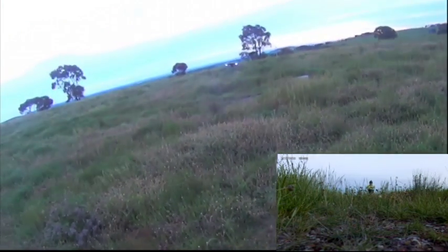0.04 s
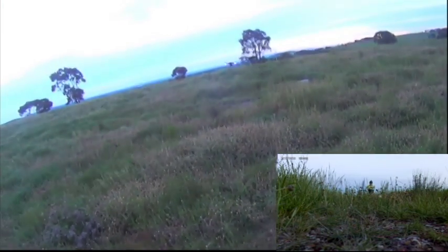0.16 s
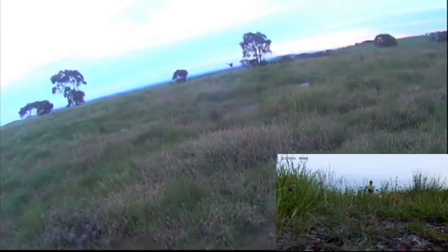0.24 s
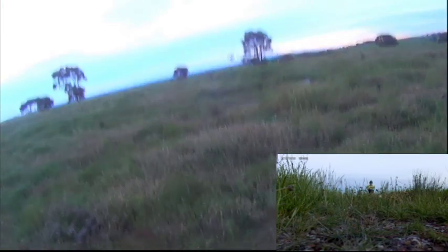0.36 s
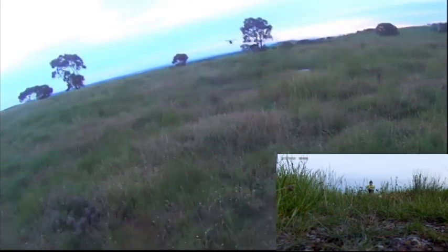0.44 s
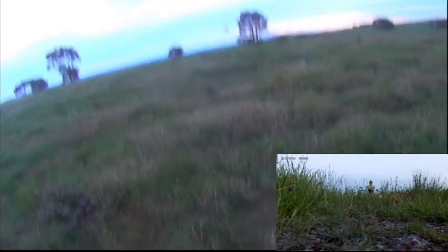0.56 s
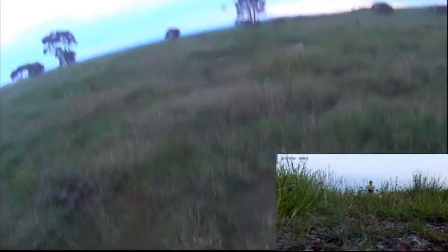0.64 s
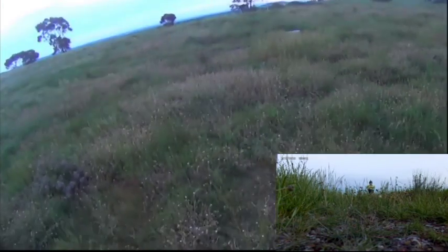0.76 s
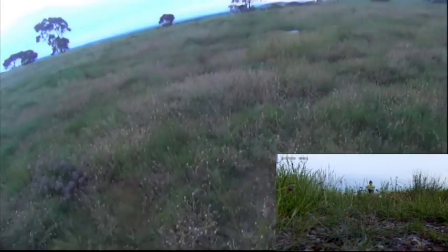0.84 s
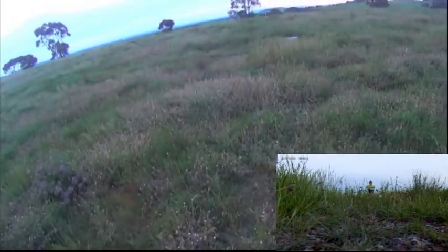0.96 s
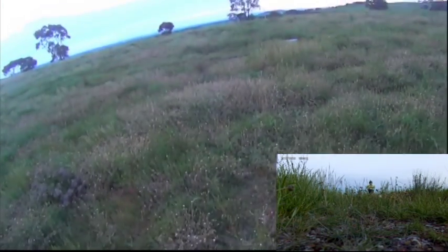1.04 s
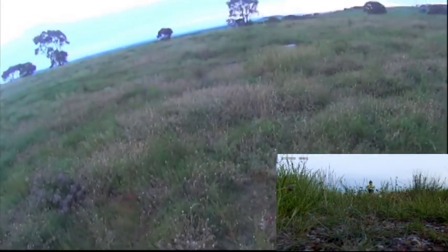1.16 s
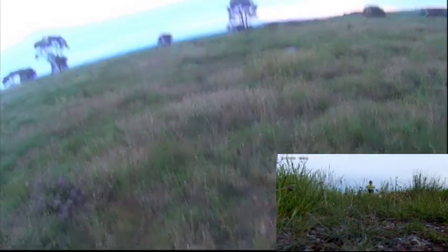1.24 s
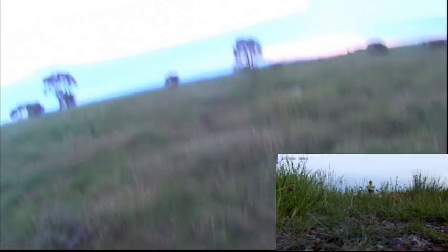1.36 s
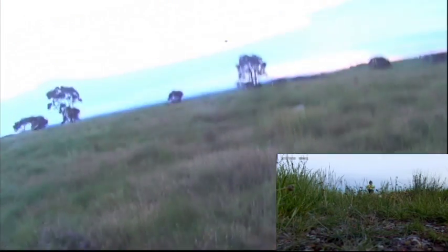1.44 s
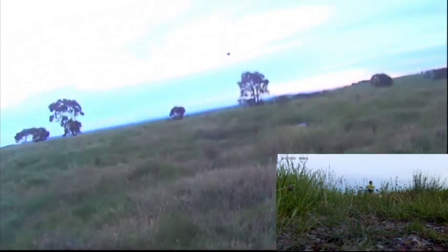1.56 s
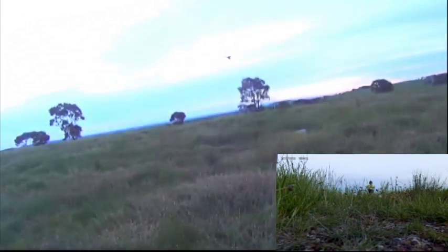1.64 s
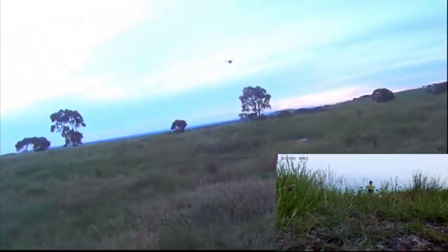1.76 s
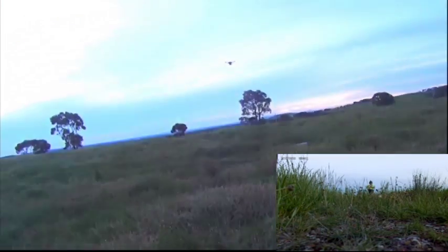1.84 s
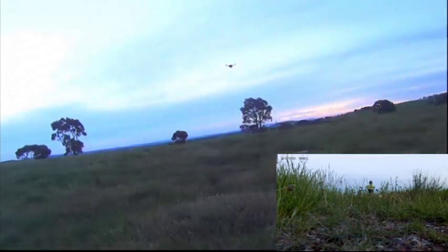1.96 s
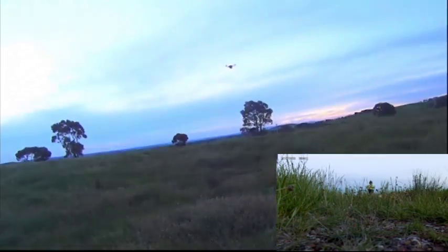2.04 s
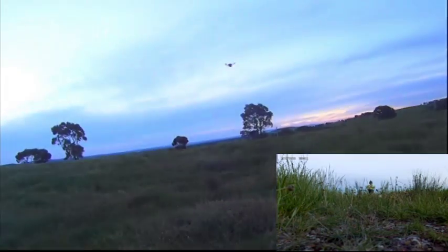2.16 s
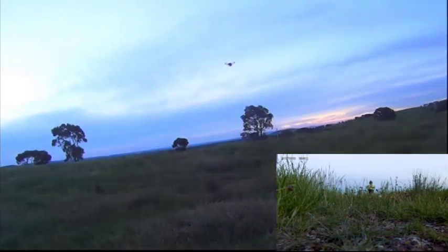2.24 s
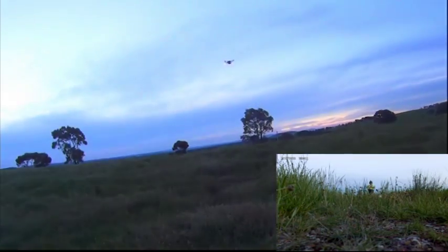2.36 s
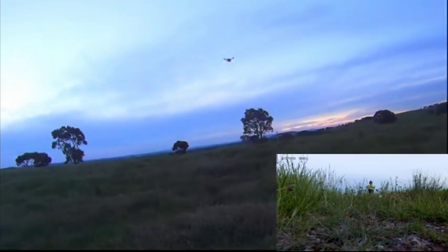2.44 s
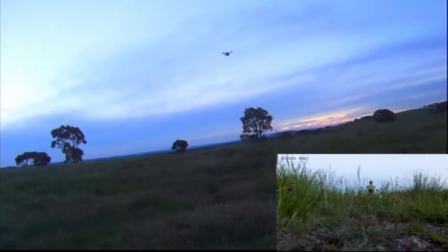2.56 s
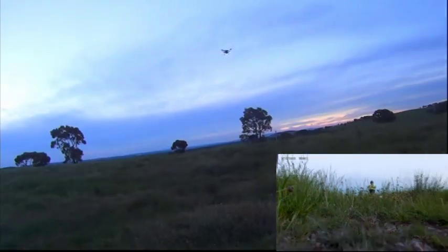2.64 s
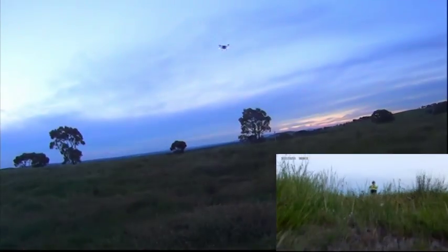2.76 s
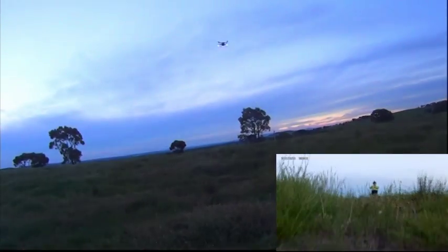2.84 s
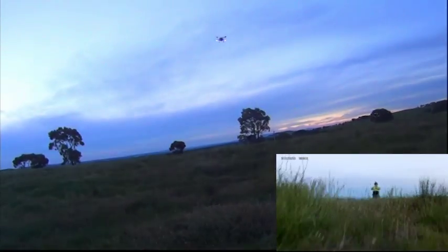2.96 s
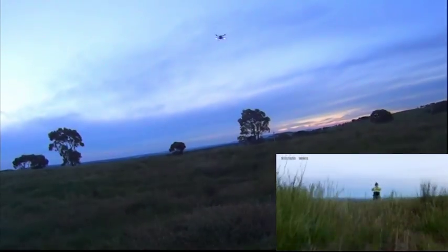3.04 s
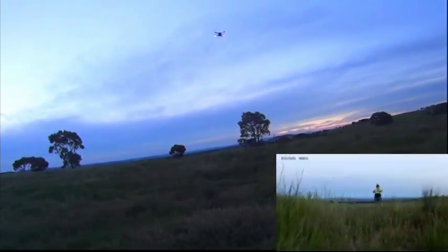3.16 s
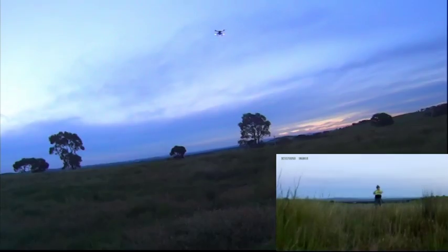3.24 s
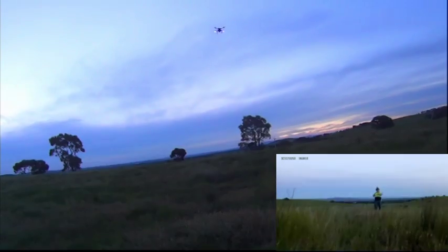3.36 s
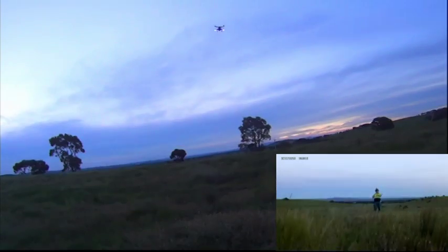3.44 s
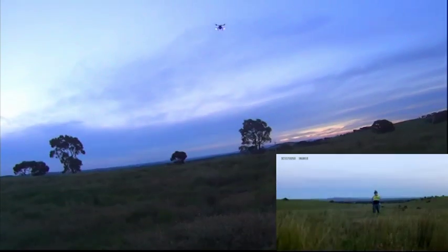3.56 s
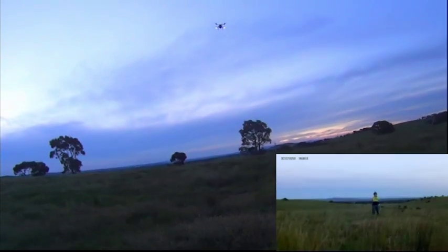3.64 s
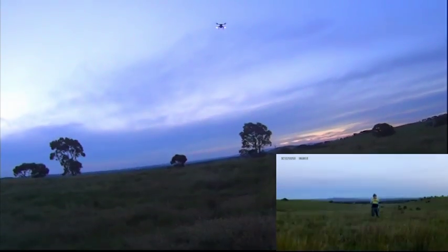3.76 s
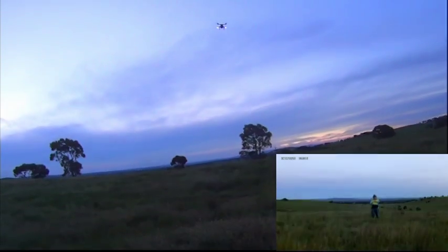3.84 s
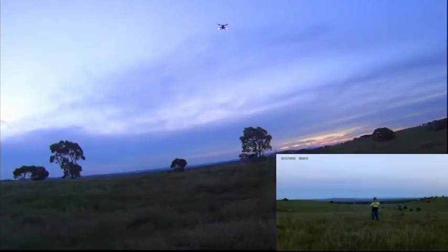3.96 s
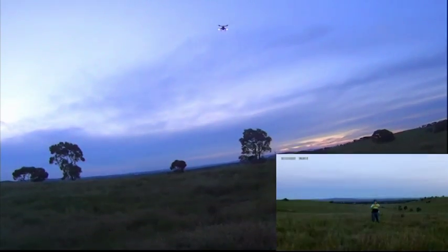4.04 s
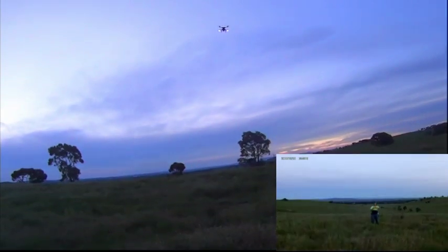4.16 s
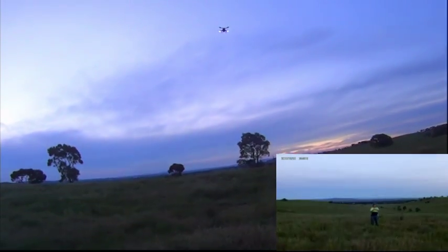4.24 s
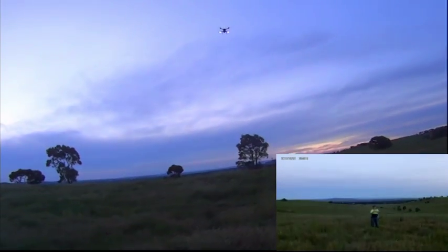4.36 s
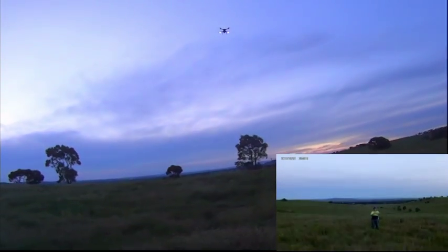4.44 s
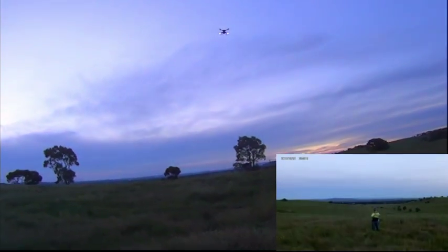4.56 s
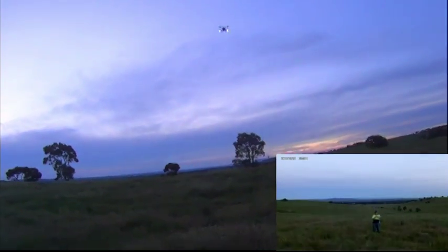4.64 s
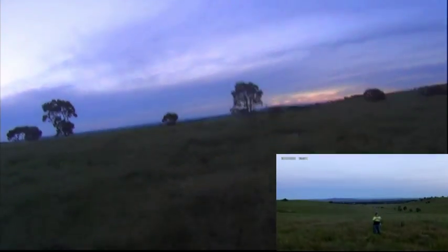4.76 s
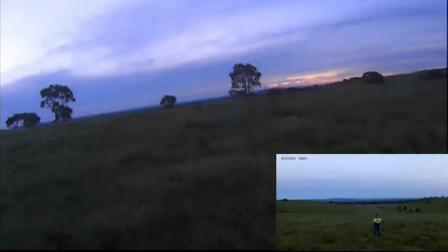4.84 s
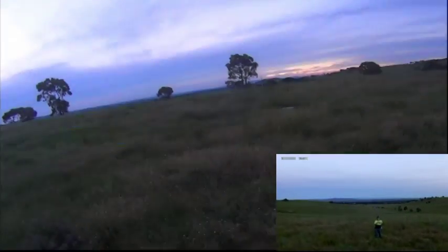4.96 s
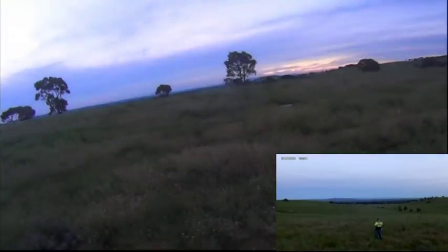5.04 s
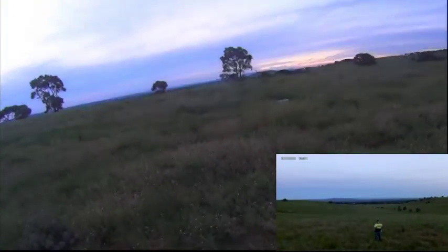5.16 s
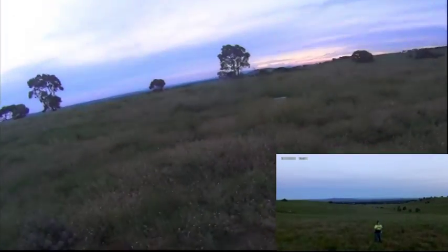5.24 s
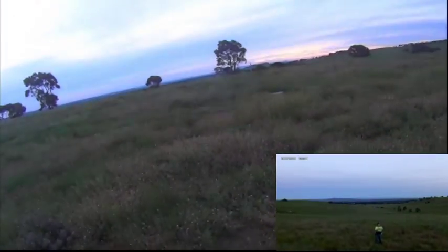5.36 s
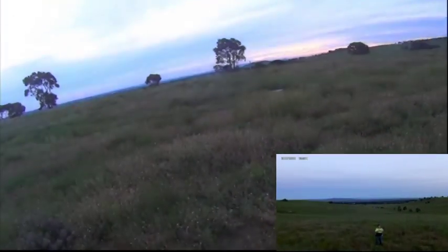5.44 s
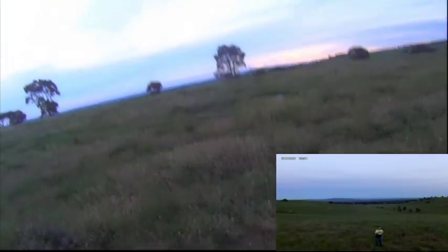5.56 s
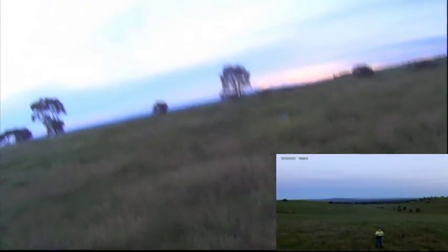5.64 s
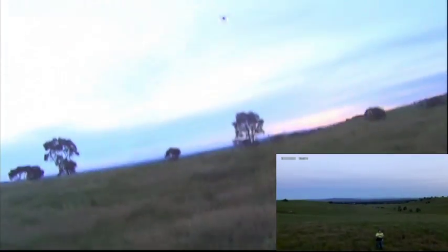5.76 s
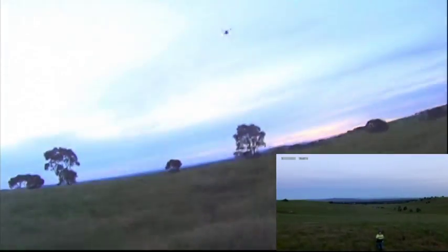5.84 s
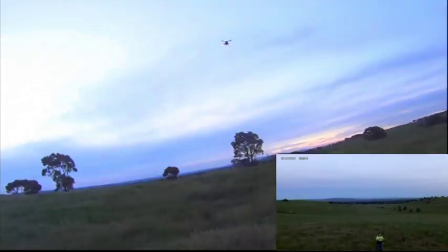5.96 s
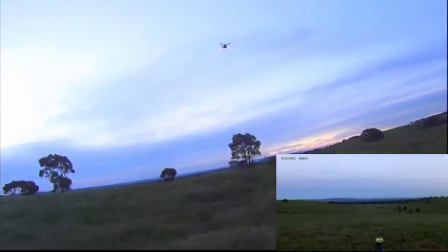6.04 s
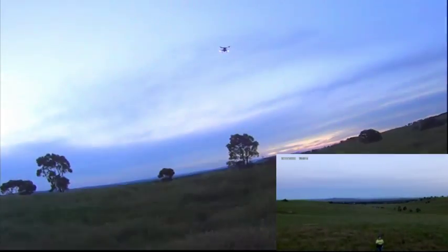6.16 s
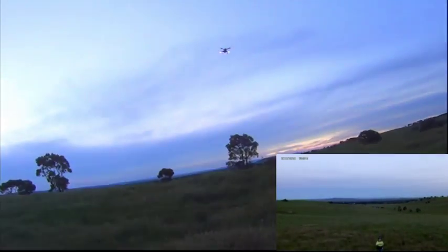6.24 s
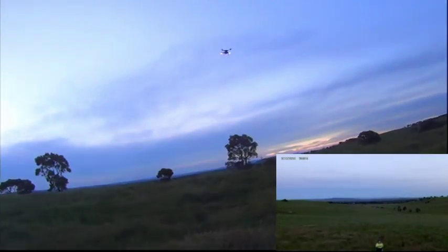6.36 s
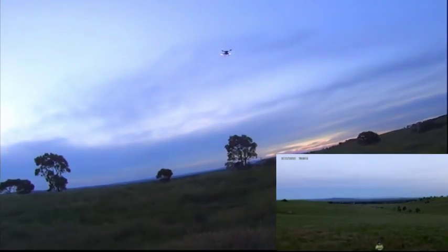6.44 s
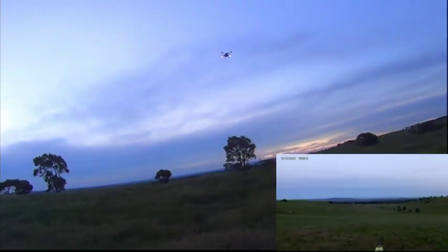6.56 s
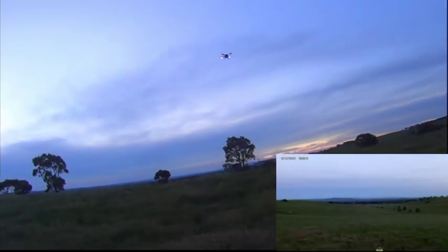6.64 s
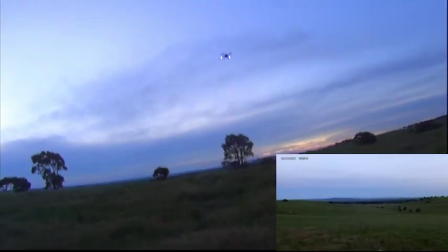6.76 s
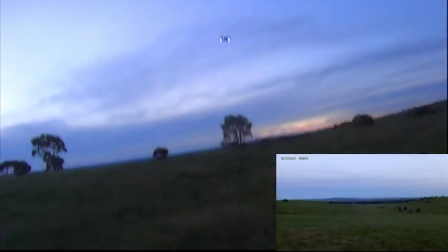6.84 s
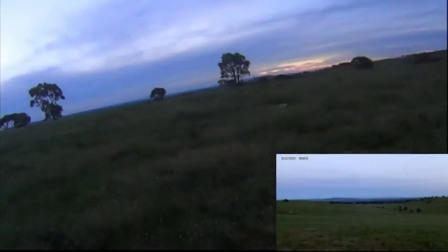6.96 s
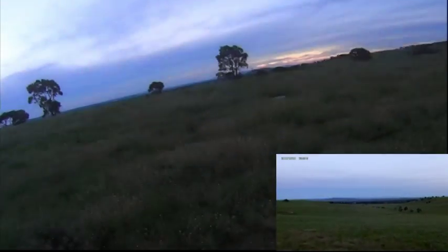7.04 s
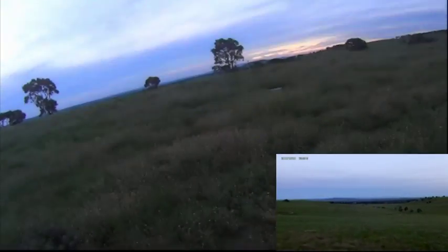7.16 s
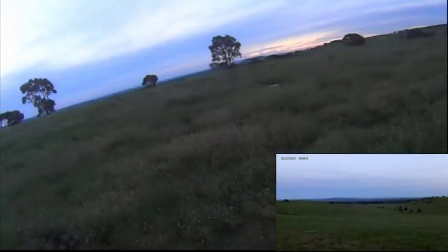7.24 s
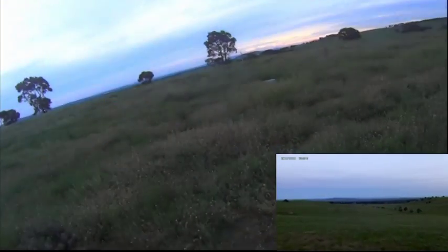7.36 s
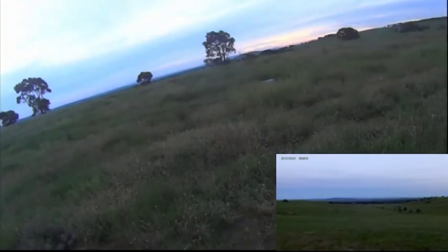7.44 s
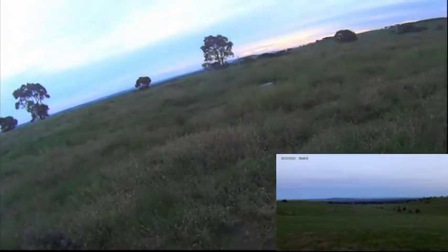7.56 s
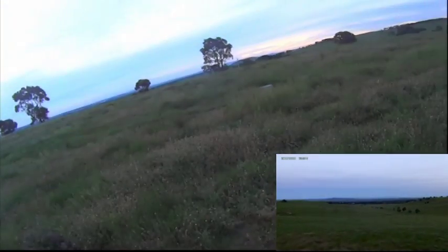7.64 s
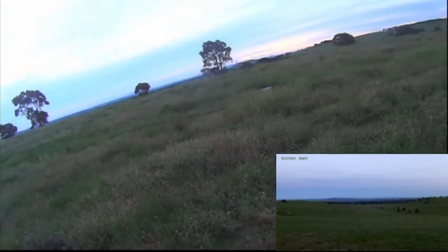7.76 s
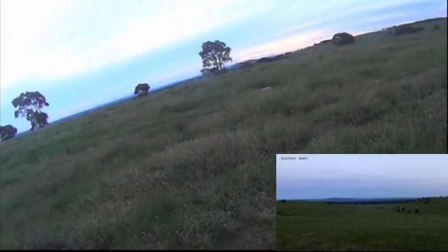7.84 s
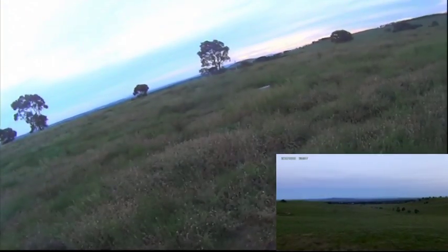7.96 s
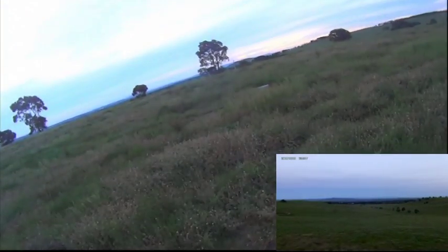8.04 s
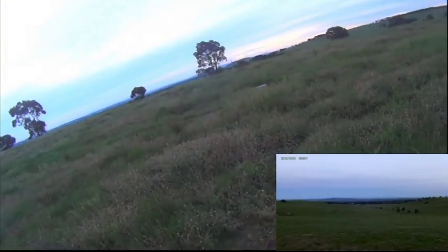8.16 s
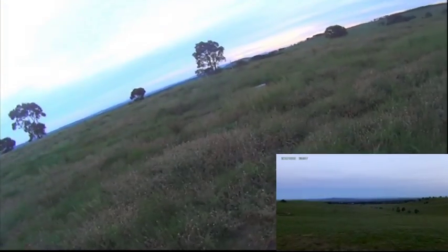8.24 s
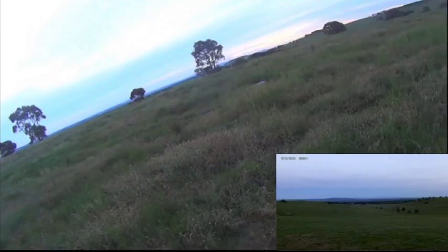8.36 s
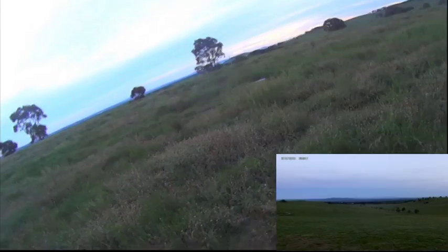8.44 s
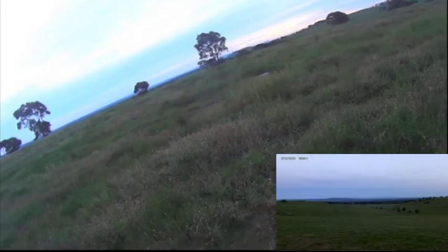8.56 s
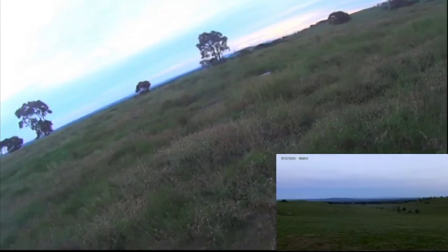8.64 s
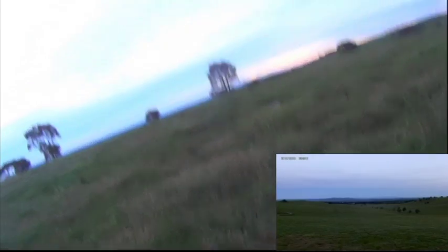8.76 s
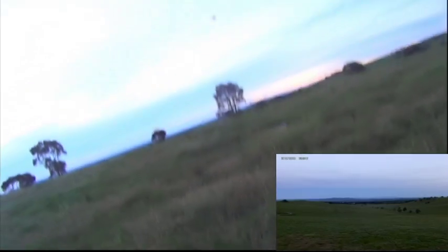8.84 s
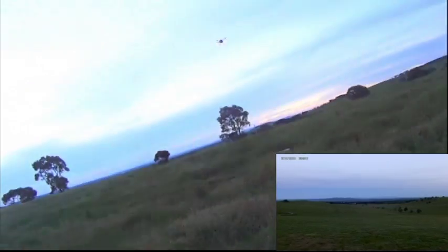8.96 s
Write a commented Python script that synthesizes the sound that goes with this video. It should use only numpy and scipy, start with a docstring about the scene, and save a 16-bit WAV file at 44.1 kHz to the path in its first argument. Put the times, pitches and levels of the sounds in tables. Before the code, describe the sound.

A small quadcopter idles in a grassy field with a quiet hum, thin whine and dry rustle, and its frame gives one soft knock. The motors then jump to a loud buzz with a brief rattle as it takes off. The whine surges and wavers with repeated throttle pushes over hissing blades. Heard from the craft's own microphone, wind buffeting grows as it climbs and roughens the sound.

```python
"""A grassy field, where a small quadcopter idles and then takes off, heard from its own camera.
Four rotors hum and buzz at multiples of their shaft speeds, and the motors' magnetic whine rings through
the frame, surging with each push on the throttle. The blades shed turbulence whose ground echo sweeps
down as the craft climbs. Bearings rustle, the frame knocks once on its legs, and wind buffets the
microphone, which overloads."""
import sys
import numpy as np
from scipy import signal
from scipy.fft import rfft, irfft
from scipy.io import wavfile

SR = 44100
rng = np.random.default_rng(int(sys.argv[2]) if len(sys.argv) > 2 else 0)


def pcm_store(signal):
    """Save signal as 16-bit PCM."""
    levels = np.round(np.clip(np.atleast_2d(signal), -1, 1) * 32767)
    wavfile.write(sys.argv[1], SR, levels.astype(np.int16).T)


N = 396900
TIME = np.arange(N) / SR
LIFT_S = 2.559   # the throttle opens
SINCE_LIFT = np.maximum(TIME - LIFT_S, 0)
AIRFLOW = np.clip(SINCE_LIFT / .17, 0, 1)   # the column of air takes a moment to get going
MAX_SPEED_UP, MAX_COAST = 1350, 110   # limits of a motor's acceleration and deceleration [turns/s^2]

# modes of the frame, lowest first: (frequency [Hz], width [Hz], gain [dB])
FRAME_MODES = [(544, 52, 6.5), (616, 44, 11.5), (1160, 77, 17.5), (1346, 18, 7), (1880, 77, 2.5)]
# spectrum of rustle and rattle: (frequency [Hz], relative density [dB])
FRICTION_SPECTRUM = [(25, -27), (80, -26), (200, -15.5), (330, -12.5), (650, -2.5), (1100, 1.5), (1600, -2),
                     (3000, -5.5), (5000, -15), (6500, -13.5), (9000, -15.5), (10500, -25), (12800, -38),
                     (15000, -24.5)]


def rotors(speeds, angles, blade_db_per_doubling=18.5, whine_db_per_doubling=7.5):
    """Forced vibration: imbalance, blades and magnets drive the frame and motor bells at shaft harmonics."""
    # imbalance and blade tones: (shaft multiple, relative level of rotor A, B, C, D [dB])
    blade_orders = [(1, -44, -42, -40, -45), (2, -46, -46, -43, -51), (3, -45, -43.5, -52, -48),
                    (4, -40, -48, -53, -53), (5, -41, -48, -53, -53), (6, -54, -58, -58, -58),
                    (7, -38, -46, -58, -58), (10, -41, -47, -53, -53)]
    # magnetic tones of the 14-pole motors: (shaft multiple, relative level of rotor A, B, C, D [dB])
    pole_orders = [(21, -40.5, -42.5, -48, -44), (28, -56, -44, -58, -58), (35, -60, -60, -53, -54),
                   (42, -49, -50, -57, -57)]
    # buzz takes over in forward flight: (time [s], whine gain [dB], hum gain [dB], buzz gain [dB])
    tone_gains = [(2.6, 4.5, 3, -13), (3.6, 2.5, 1, -1), (4.4, 3.5, 2.5, 4), (7.32, 2.5, 3, 4.5),
                  (7.47, -19, 0.5, -7), (7.8, -10, 1.5, 8.5), (8.6, -9, 3.5, 5.5), (8.75, -7, -5, 7),
                  (9, -6, -2, 10)]
    # modes of the motor bells: (frequency [Hz], width [Hz], gain [dB])
    bell_modes = [(4230, 800, 7), (5930, 750, 14)]
    whine_db, hum_db, buzz_db = in_time(tone_gains)
    hums = [harmonics(angle, blade_orders[:3], k) for k, angle in enumerate(angles)]
    hums[2] *= thrum(speeds[2])   # rotor C
    buzz = sum(harmonics(angle, blade_orders[3:], k) for k, angle in enumerate(angles))
    whine = sum(surge(speeds[k]) * harmonics(angle, pole_orders, k) for k, angle in enumerate(angles))
    effort = doublings(speeds)
    blades = from_db(hum_db) * sum(hums) + from_db(buzz_db) * buzz
    blades *= from_db(blade_db_per_doubling * effort)
    whine *= from_db(whine_db + whine_db_per_doubling * effort)
    return resonate(blades + whine, FRAME_MODES + bell_modes)


def harmonics(angle, orders, rotor, flutter_db=1.0):
    """Periodic forcing gives partials locked to one shaft; each flutters in level on its own."""
    out = np.zeros(N)
    for multiple, *levels in orders:
        phase = round(multiple) * angle + rng.uniform(0, 2 * np.pi)
        out += from_db(levels[rotor] + flutter_db * drift(33)) * np.sin(phase)
    return np.sqrt(2) * out


def surge(speed, push_db=2.6, inrush_db=17.5):
    """Torque takes current: the whine grows as a motor speeds up and drops as it coasts."""
    acceleration = np.gradient(speed) * SR
    inrush = (acceleration / MAX_SPEED_UP) ** 2
    return from_db(push_db * np.tanh(acceleration / MAX_COAST) + inrush_db * inrush)


def thrum(speed, arm_hz=147.8, half_width_hz=4.5, wake_db=9.5, db_per_s=1.55):
    """Resonance: an unbalanced rotor shakes most near its arm's mode, in its wake and as airspeed grows."""
    arm_db = 7.5 / (1 + ((speed - arm_hz) / half_width_hz) ** 2)
    return from_db(-8.5 + arm_db + wake_db * ground_effect() + db_per_s * SINCE_LIFT)


def rotor_speeds(push_share_c=.65, push_share_d=.15):
    """Thrust is steered by shaft speed [turns/s]: idle at first, then trim, pushes and small corrections."""
    # idling on the ground: (time [s], speed of rotor A, B, C, D [turns/s])
    idle_speeds = [(0, 54.2, 56.6, 48.4, 39), (1, 55.8, 57.1, 48.8, 39.6), (1.95, 56, 57.1, 49.1, 39.8),
                   (2.35, 55.1, 56.9, 49.2, 39.8)]
    # holding the craft's attitude: (time [s], speed of rotor A, B, C [turns/s])
    trim_speeds = [(2.56, 187, 186, 188), (3.1, 183.0, 185.0, 170), (3.65, 186.0, 186.0, 150.0),
                   (4.15, 185.0, 196.0, 160.0), (5.25, 183.0, 196.0, 150.0), (5.6, 184.0, 198.0, 155.0),
                   (7.15, 188.0, 199.0, 156.0), (7.55, 184, 199.0, 138.0), (7.8, 192.0, 194.0, 149),
                   (8.3, 191.0, 192.0, 147), (8.8, 182.0, 186.0, 146)]
    # pushes on the throttle: (start [s], length [s], added command for rotor A, B [turns/s])
    throttle_pushes = [(2.89, 0.53, 16.0, 14.0), (3.79, 0.28, 12.0, 16.0), (4.24, 0.19, 10.0, 16.0),
                       (4.57, 0.16, 14.0, 15.0), (4.87, 0.15, 12.0, 17.0), (5.34, 0.11, 18.0, 22.0),
                       (5.61, 0.25, 12.0, 15.0), (5.94, 0.07, 9.0, 14.0), (6.08, 0.21, 11.0, 15.0),
                       (6.39, 0.16, 4.0, 14.0), (6.62, 0.16, 6.0, 10.0), (6.82, 0.39, 10.0, 15.0),
                       (8.41, 0.14, 6.0, 9.0), (8.86, 0.14, 8.0, 2.0)]
    push_a, push_b = np.zeros((2, N))
    for start, length, add_a, add_b in throttle_pushes:
        held = slice(int(start * SR), int((start + length) * SR))
        push_a[held], push_b[held] = add_a, add_b
    pushes = push_a, push_b, push_share_c * push_b, push_share_d * push_b
    trims = in_time(trim_speeds) + [171 + 3.5 * drift(1.5)]   # rotor D roams about one speed
    return [spin(np.where(TIME < LIFT_S, idle, trim + push + .9 * drift(9)))
            for idle, trim, push in zip(in_time(idle_speeds), trims, pushes)]


def spin(command, lag_s=.055, hop=100):
    """Inertia: a motor lags its command, speeding up as its current allows and coasting down slowly."""
    speed, track = command[0], []
    for wanted in command[::hop].tolist():
        track.append(speed)
        acceleration = min(max((wanted - speed) / lag_s, -MAX_COAST), MAX_SPEED_UP)
        speed += acceleration * hop / SR
    return np.interp(TIME, TIME[::hop], track)


def shaft_angle(speed, nudge=.002):
    """Phase is the integral of speed, which the flight controller nudges all the time."""
    return 2 * np.pi * np.cumsum(speed * (1 + nudge * drift(14))) / SR


def doublings(speeds):
    """Octaves by which the two leading rotors turn above the hover speed of 185 turns/s."""
    return np.log2((speeds[0] + speeds[1]) / 2 / 185)


def blade_turbulence(speeds, angles, chop=0.088, gust_db=0.67, rise_s=0.012):
    """Turbulence shed by the blades radiates broadband noise, amplitude-modulated at every turn."""
    # midrange rush of churned air: (frequency [Hz], relative density [dB])
    wash_spectrum = [(30, -29), (200, -17), (420, -14.5), (700, -5), (1100, 0.5), (1500, 1), (2000, 0.5),
                     (2800, -6), (4000, -11), (8000, -28), (16000, -62)]
    # treble hiss of the blades: (frequency [Hz], relative density [dB])
    hiss_spectrum = [(1500, -24), (2800, -17), (3900, -6), (5500, 0.5), (6800, -0.5), (9000, -9.5),
                     (11000, -14), (12500, -26), (15000, -30), (16000, -26)]
    passes = sum(np.cos(angle) + .5 * np.cos(2 * angle) for angle in angles)
    pulses = rms_one(np.exp(chop * passes) * from_db(gust_db * drift(32)))
    # both grow with rotor speed, near the ground and as the craft gathers pace
    effort, wake = doublings(speeds), ground_effect()
    wash = from_db(-16 + 3 * effort + 8.5 * wake + 0.67 * SINCE_LIFT) * noise(wash_spectrum)
    hiss = from_db(-19 + 6 * effort + 4.5 * wake + 0.195 * SINCE_LIFT) * noise(hiss_spectrum)
    throttle = np.clip(SINCE_LIFT / rise_s, 0, 1)
    return pulses * (AIRFLOW * wash + throttle * hiss)


def ground_echo(x, grass_hz=3300, reflection=.52, half_height_m=.2):
    """Interference with the echo makes a comb that sweeps down and fades; grass absorbs the treble."""
    height = altitude()
    delay = 2 * height / 343
    dull = signal.sosfiltfilt(signal.butter(2, grass_hz, fs=SR, output="sos"), x)
    strength = reflection / (1 + (height / half_height_m) ** 2)
    return x + strength * np.interp(TIME - delay, TIME, dull)


def ground_effect(half_height_m=0.25):
    """Near the ground the blades churn their own wake: almost 1 on the grass, 0 in free air."""
    return 1 / (1 + (altitude() / half_height_m) ** 2)


def altitude(legs_m=0.037, leave_s=2.68, climb_m_per_s2=1.28):
    """Height [m] under uniform acceleration, once the legs leave the grass."""
    return legs_m + climb_m_per_s2 * np.maximum(TIME - leave_s, 0) ** 2 / 2


def bearings(angles, level_db=-35, scrape=0.07):
    """Friction in the bearings makes a dry rustle that swells once a turn."""
    swell = rms_one(np.exp(scrape * sum(np.cos(angle) for angle in angles)))
    return from_db(level_db) * noise(FRICTION_SPECTRUM) * swell


def jolt(rattle_db=-20, rattle_t60_s=0.44, thud_db=-14, thud_t60_s=.055):
    """Step excitation: the opening throttle rattles the arms and strikes the lowest frame mode."""
    age = np.minimum(SINCE_LIFT, 1)
    rattle = from_db(rattle_db - 60 * age / rattle_t60_s) * noise(FRICTION_SPECTRUM)
    thud = from_db(thud_db - 60 * age / thud_t60_s) * np.sin(2 * np.pi * FRAME_MODES[0][0] * age)
    return (age > 0) * (rattle + thud)


def wind(gain_db=3, lumpy_db=2.5, downwash_db=-41):
    """Pressure fluctuations at the microphone: lumpy buffeting over the rumble of the downwash."""
    # the wind grows as the craft climbs: (time [s], relative level [dB])
    wind_levels = [(2.6, -51), (3.4, -32.5), (5.2, -31), (5.42, -28), (6.9, -26), (7.3, -22), (7.55, -29),
                   (8.1, -23), (8.6, -22), (8.8, -26.5)]
    # buffeting: (frequency [Hz], relative density [dB])
    buffet_spectrum = [(60, -42), (125, -11), (170, -3.5), (300, -2.5), (550, -2.5), (900, -9.5),
                       (2000, -9), (8000, -60)]
    # rumble of the air driven down: (frequency [Hz], relative density [dB])
    downwash_spectrum = [(20, -13), (60, -12), (82, -1), (110, -1.5), (200, -23), (800, -50)]
    wind_db, = in_time(wind_levels)
    buffeting = from_db(gain_db + wind_db + lumpy_db * drift(25)) * noise(buffet_spectrum)
    return AIRFLOW * (buffeting + from_db(downwash_db) * noise(downwash_spectrum))


def knock():
    """Damped free vibration: the frame rocks on its legs with a dull thud."""
    # soft impact: (time [s], level [dB])
    impacts = [(1.362, -33)]
    # modes it excites: (frequency [Hz], relative level [dB], time to fall 60 dB [s])
    modes = [(74, -3, .17), (334, -5, 0.073), (404, 0, .07)]
    out = np.zeros(N)
    for start, level_db in impacts:
        age = np.maximum(TIME - start, 0)
        for hz, db, t60 in modes:
            out += from_db(level_db + db - 60 * np.minimum(age / t60, 2)) * np.sin(2 * np.pi * hz * age)
    return out


def from_db(db):
    """Decibels to amplitude ratio."""
    return 10 ** (np.asarray(db) / 20)


def rms_one(x):
    """Normalisation to rms 1."""
    return x / np.sqrt(np.mean(x ** 2) + 1e-20)


def in_time(rows):
    """Linear interpolation of each column of a curve at every sample."""
    times, *columns = np.transpose(rows)
    return [np.interp(TIME, times, column) for column in columns]


def drift(corner_hz, hop=100, settle=1000):
    """Low-passed noise: a smooth random fluctuation of rms 1."""
    pole = np.exp(-2 * np.pi * corner_hz * hop / SR)
    white = rng.standard_normal(N // hop + settle + 2)
    slow = signal.lfilter([1], [1, -2 * pole, pole * pole], white)[settle:]
    return np.interp(np.arange(N) / hop, np.arange(len(slow)), rms_one(slow))


def noise(spectrum):
    """Stationary noise with a given spectral shape, rms 1."""
    hz, db = np.transpose(spectrum)
    bins = np.maximum(np.fft.rfftfreq(N, 1 / SR), 1)
    gain = from_db(np.interp(np.log(bins), np.log(hz), db))
    return rms_one(irfft(rfft(rng.standard_normal(N)) * gain, N))


def resonate(x, peaks):
    """Resonances and antiresonances as second-order filters in series."""
    for hz, width, db in peaks:
        centre = -2 * np.cos(2 * np.pi * hz / SR)
        half, gain = np.pi * width / SR, from_db(db / 2)
        numerator = [1 + half * gain, centre, 1 - half * gain]
        denominator = [1 + half / gain, centre, 1 - half / gain]
        x = signal.lfilter(numerator, denominator, x)
    return x


def scene():
    """Superposition: all sources add and reach the microphone through the camera's resonant shell."""
    # ringing of the rustle and jolt: (frequency [Hz], width [Hz], gain [dB])
    bearing_modes = [(4120, 660, 4.7), (5810, 470, 11.6)]
    # peaks and hollows of the shell: (frequency [Hz], width [Hz], gain [dB])
    shell_response = [(2178, 195, -5.5), (2460, 210, 2), (3070, 320, -3), (3880, 760, 4.5), (5370, 200, 2),
                      (6160, 370, -4), (8000, 545, -27.5), (11100, 670, 3.5), (13100, 800, 0),
                      (14100, 1700, 9)]
    speeds = rotor_speeds()
    angles = [shaft_angle(speed) for speed in speeds]
    motors = rotors(speeds, angles)
    rustle = resonate(bearings(angles) + jolt(), bearing_modes)
    air = ground_echo(blade_turbulence(speeds, angles)) + wind()
    return resonate(motors + rustle + air + knock(), shell_response)[None]


def record(dry, ceiling=0.5, knee=10, stopband_hz=16400):
    """Saturation: the microphone overloads with a firm knee, and a low-pass cuts the top."""
    clipped = dry / (2.5 + (dry / ceiling) ** knee) ** (1 / knee)
    return signal.sosfilt(signal.cheby2(16, 70, stopband_hz, fs=SR, output="sos"), clipped)


dry = scene()
out = record(dry)
pcm_store(out)
```